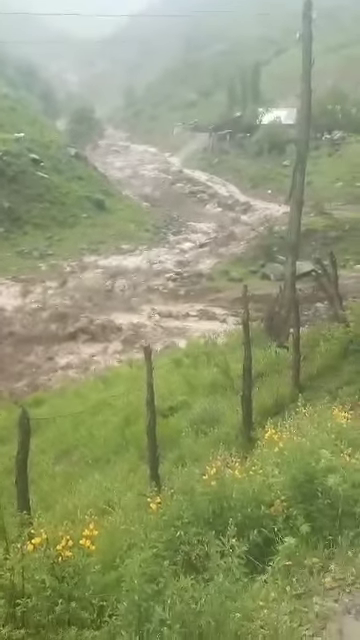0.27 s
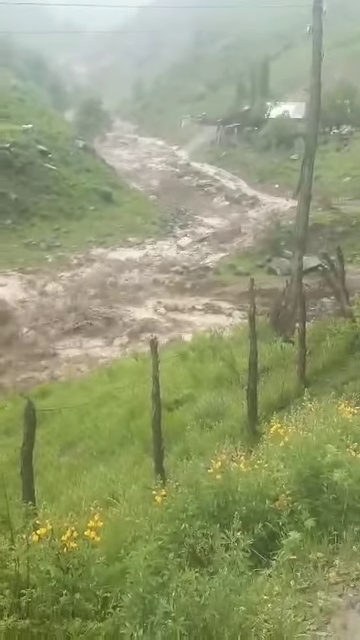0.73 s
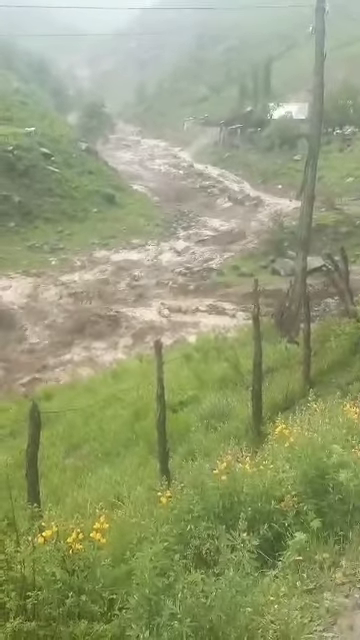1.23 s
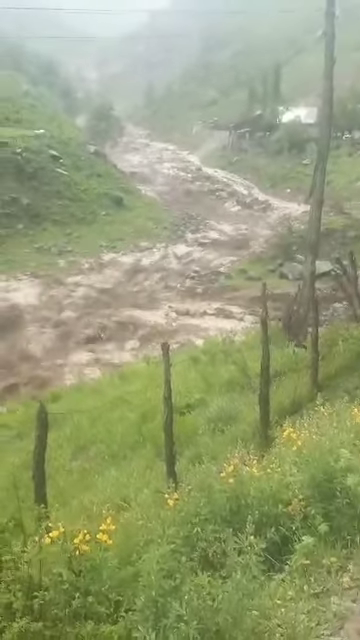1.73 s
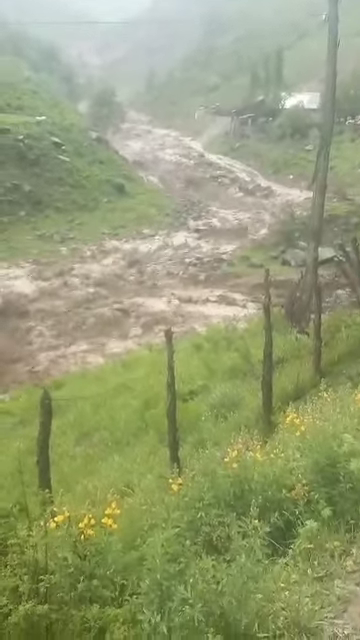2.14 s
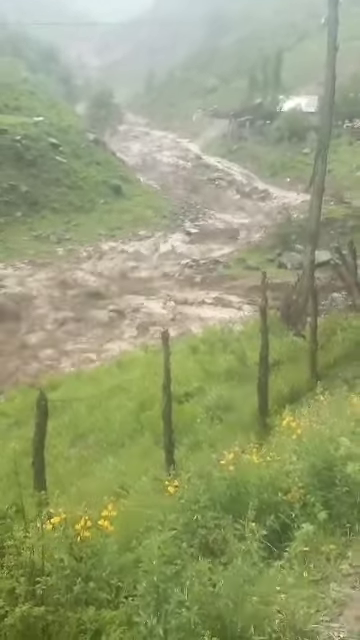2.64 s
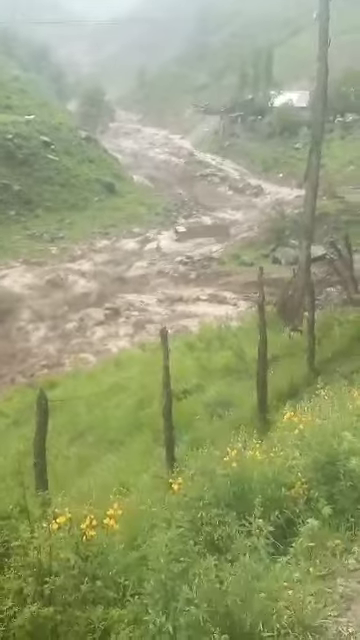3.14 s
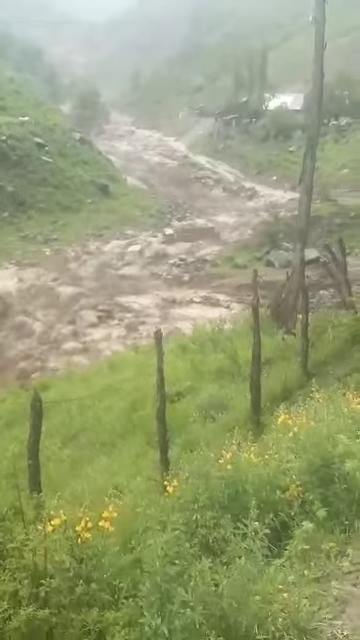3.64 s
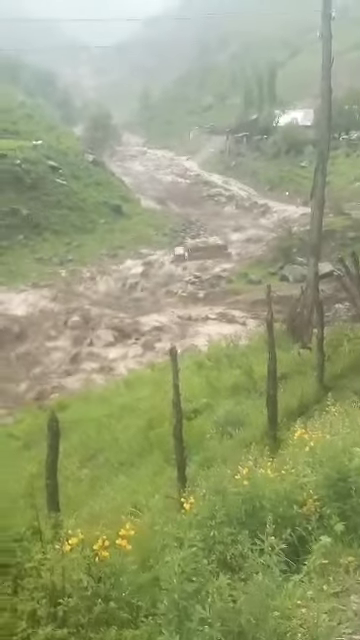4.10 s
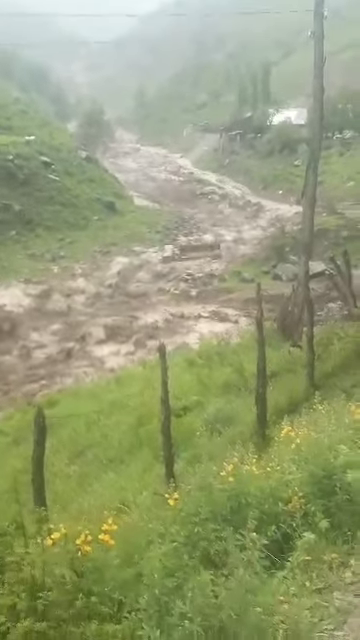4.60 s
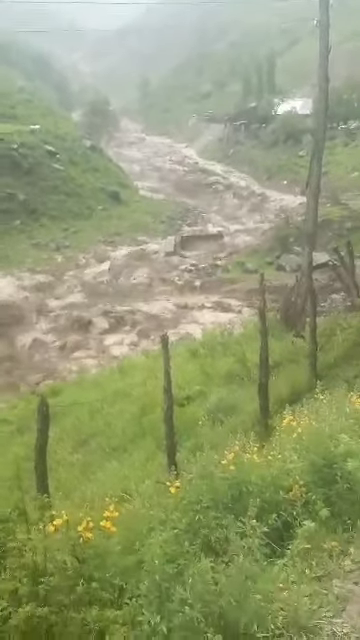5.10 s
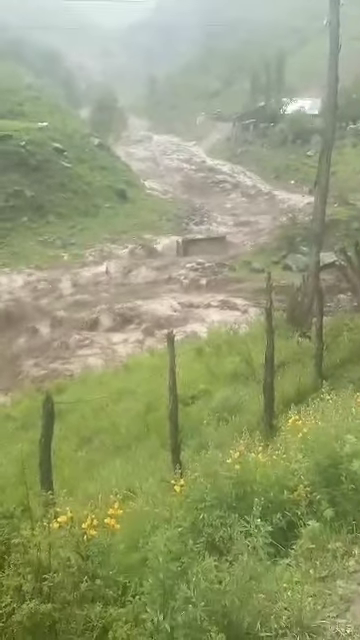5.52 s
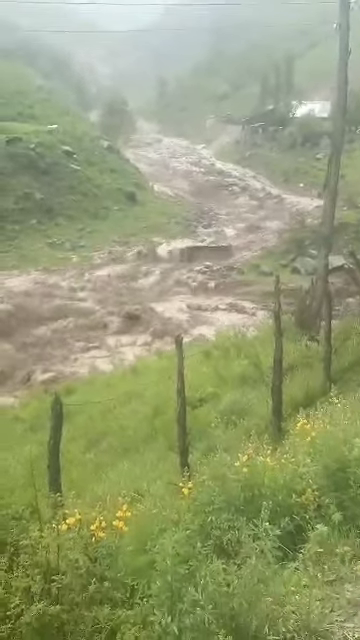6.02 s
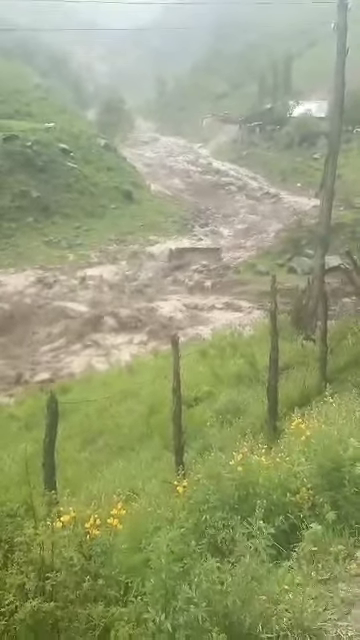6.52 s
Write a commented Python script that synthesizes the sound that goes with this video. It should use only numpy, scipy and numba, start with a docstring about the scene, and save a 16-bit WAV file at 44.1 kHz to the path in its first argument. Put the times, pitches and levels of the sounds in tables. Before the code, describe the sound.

Continuous heavy mudflow roar with deep rumble and thin spray, open on the right, muffled on the left, with sparse raindrop taps.

```python
"""Mudflow heard through one open and one covered port

A mudflow roars down a stream bed: shaped noise in half-octave bands gives rumble, slosh, churn and spray.
Stones knock as short damped sines. The phone's right port is open; the covered left one hears a muffled roar.
Raindrops tap the phone, mostly on the covered port, as decaying port modes with a crack and a tick.
The hardest drops make the limiter duck both channels."""
import sys
import numpy as np
from scipy import signal
from scipy.fft import rfft, irfft
from scipy.io import wavfile
from scipy.ndimage import uniform_filter1d, minimum_filter1d
from numba import njit

SR = 44100
rng = np.random.default_rng(int(sys.argv[2]) if len(sys.argv) > 2 else 0)


def store_pcm(level_fs):
    """Save levels as 16-bit WAV."""
    pcm = np.round(np.clip(level_fs, -1, 1) * 32767).astype(np.int16)
    wavfile.write(sys.argv[1], SR, np.atleast_2d(pcm).T)


N = 297675
HZ = np.arange(N // 2 + 1) * SR / N + 1e-9  # frequency of each Fourier bin, kept above 0 for the logarithms


def undb(db):
    """Amplitude ratio: 20 dB for each factor of ten."""
    return 10 ** (np.asarray(db) / 20)


def coloured(points, db):
    """Spectral shaping of white noise: its Fourier transform, weighted by a density curve, at an rms level in dB."""
    hz, density_db = np.transpose(points)
    shape = undb(np.interp(np.log(HZ), np.log(hz), density_db, right=-200))
    white = rfft(rng.standard_normal(N))
    return white * shape * undb(db) / np.sqrt(np.mean(shape ** 2))


def walk(rate):
    """Slow random modulation: levels held for 1 / rate s, smoothed by two moving averages; spread near 1."""
    hold = int(SR / rate)
    steps = np.repeat(rng.standard_normal(N // hold + 1), hold)
    return 1.3 * uniform_filter1d(uniform_filter1d(steps, hold), hold)[:N]


def butter(x, hz, kind, order):
    """Causal Butterworth filtering: a maximally flat low-, high- or band-pass."""
    return signal.sosfilt(signal.butter(order, hz, kind, fs=SR, output="sos"), x)


def torrent():
    """Band-wise amplitude modulation of noise: bands follow the flow, with shared and separate random flicker."""
    # The flow slackens and picks up again. Each row: time in seconds, roar level in dB (its mean is removed),
    # extra level in dB of the rumble, of the slosh and of the spray.
    flow = [(0.0, -29.5, 1, 1.5, 1.1), (.35, -29, -1, 1.5, 0.8), (0.75, -28.5, 0, -0.5, 0.4),
            (1.05, -28.5, 0, 1.5, 0.5), (1.45, -28, -2.7, -2, -0.4), (1.9, -28.5, 0.5, -0.1, 0),
            (2.45, -28.5, -0.5, 0.5, -0.2), (2.9, -29, 1, -0.6, -0.4), (3.2, -28, -2, -0.7, -.8),
            (3.6, -29, 1, -0.8, -0.3), (4.15, -28.5, -0.5, -0.8, -0.9), (4.45, -29, 1.2, 1.8, -0.3),
            (4.8, -30.5, -0.5, 0.5, 1), (5.1, -30, 1.5, -1.2, 0.6), (5.6, -29, -3.5, -0.6, -0.2),
            (6.05, -28.5, -1.5, -0.5, 0.2), (6.35, -29.5, -1, 2.5, 0.3), (6.75, -28, 0, -0.5, -0.7)]
    # Centres in Hz of boulder rumble, sloshing mud, churning water and spray.
    layer_hz = (80, 240, 700, 3500)
    # How far each of those layers follows the flow, in dB per dB.
    follows_flow = (0.87, 1.04, 0.84, 1.26)
    # Spectra of the three noises. Each row: frequency in Hz, relative density in dB per Hz.
    rumble_spectrum = [(15, -47), (25, -36), (42, -15.5), (57, -3.5), (80, -1), (105, 1), (135, -3.5),
                       (166, -6.5), (210, -6.5), (253, -5.5), (330, -11.5), (376, -20), (430, -20),
                       (520, -41), (970, -120)]
    roar_spectrum = [(340, -58), (430, -16.5), (470, -5.5), (549, -.5), (780, -4), (893, -7), (1320, -13.5),
                     (1760, -12), (2060, -7), (2220, -10.5), (2340, -17.5), (2500, -27.5), (3250, -39),
                     (5500, -120)]
    spray_spectrum = [(1350, -13.5), (2300, -7), (2590, -8), (2920, -5.5), (3190, -8), (3500, -5),
                      (3950, -8.5), (4270, -12), (4600, -9.5), (4990, -8), (6490, -16), (7800, -35),
                      (8650, -35), (10100, -26.5), (10900, -33.5), (12400, -29), (15500, -38)]
    rumble_rms_db, roar_rms_db, spray_rms_db = -18.5, -22, -35.5  # before the flow modulates them
    rumble_top_hz = 130  # boulder rumble below, sloshing mud above
    bass_hz = 380  # below it rumble and slosh take their extra levels
    spray_hz = 2500  # above it the spray comes and goes
    top_hiss_hz = 7000  # above it the bands share one extra random flicker
    low_flicker_db, high_flicker_db = 0.57, 0.25  # at 80 and 3500 Hz
    shared_db, top_flicker_db, tumble_depth_db = -0.08, 0.5, 1.0

    t = np.arange(N) / SR
    flow_s, flow_db, *extra_db = np.transpose(flow)
    rumble_db, slosh_db, spray_db = (np.interp(t, flow_s, db) for db in extra_db)
    surge_db = np.interp(t, flow_s, flow_db - np.mean(flow_db))
    water = coloured(rumble_spectrum, rumble_rms_db)
    water = water + coloured(roar_spectrum, roar_rms_db)
    water = water + coloured(spray_spectrum, spray_rms_db)
    gush, top_flicker, tumble = walk(7), walk(9), walk(14)
    out = np.zeros(N)
    for hz in 20 * 2 ** np.arange(0, 10.1, .5):
        # overlapping triangles on a log frequency axis add up to one
        band = irfft(water * np.clip(1 - 2 * abs(np.log2(HZ / hz)), 0, 1), N)
        follows = np.interp(np.log(hz), np.log(layer_hz), follows_flow)
        depth_db = np.interp(np.log(hz), np.log([80, 3500]), [low_flicker_db, high_flicker_db])
        level_db = follows * surge_db + shared_db * gush + depth_db * walk(12)
        if hz < rumble_top_hz:
            level_db += rumble_db + tumble_depth_db * tumble
        elif hz < bass_hz:
            level_db += slosh_db
        if hz > spray_hz:
            level_db += spray_db
        if hz > top_hiss_hz:
            level_db += top_flicker_db * top_flicker
        out += band * undb(level_db)
    return out


def knocks():
    """Impact resonance: stones clack under water as short damped sines, some at set times, many small at random."""
    # Stones at set times, most of them loud.
    # Each row: start in seconds, peak of the envelope in dB, pitch in Hz.
    timed = [(0.394, -31, 738), (4.895, -14, 681), (5.091, -16, 781), (5.995, -10.5, 660)]
    small_count, least_db, t60_s = 150, -26, 0.016  # least level holds for a small stone of 600 Hz
    chance = rng.random((small_count, 3))
    start_s = chance[:, 0] * N / SR
    small_db = least_db - 1.96 * np.log(1 - chance[:, 1])
    small_hz = 450 * 5 ** chance[:, 2]
    small_db -= 5.5 * np.log2(small_hz / 600)  # smaller stones ring higher and weaker
    small = np.transpose([start_s, small_db, small_hz])
    t = np.arange(2048) / SR
    out = np.zeros(N + len(t))
    for s, db, hz in [*timed, *small]:
        swell = (1 - np.exp(-t * hz)) * 1000. ** (-t / t60_s)
        out[int(s * SR):][:len(t)] += undb(db) * swell / swell.max() * np.sin(2 * np.pi * hz * t)
    return out[:N]


def raindrops():
    """Modal excitation: each drop jolts a port cavity, which rings for a few ms; its splash cracks and ticks."""
    # Each row: time of the ring's peak in seconds, port (0 left, 1 right), ring peak in dB,
    # push 1 or pull -1, thump boost over the other modes in dB, crack peak in dB, tick peak in dB.
    drops = [(.0284, 1, -45, 1, 0, -50, -40), (.4895, 0, -38, 1, 0, -36, -47),
             (.6107, 0, -20, -1, 0, -26, -38), (3.4591, 1, -45, 1, 0, -50, -37),
             (3.4605, 0, -24, -1, 0, -55, -62), (4.5281, 0, 8.5, 1, 0, -38, -26),
             (4.7428, 1, -45, 1, 0, -50, -40), (5.7214, 0, -19, -1, 16, -55, -50),
             (5.7214, 1, -45, 1, 0, -55, -45), (6.251, 0, -34, 1, 0, -60, -68),
             (6.4174, 0, -35, -1, 0, -55, -57), (6.63685, 0, 1, 1, 4, -36, -20)]
    # Port modes, the two lowest being the thump. Each row: frequency in Hz, level before filtering in dB,
    # 60 dB decay time in seconds.
    port_modes = [(330, -10, .014), (780, -3, .007), (1250, -8, .005), (2200, -7.5, .003)]
    # Splash tick of the left, then of the right port. Each row: lower and upper band edge in Hz.
    tick_hz = ((10300, 15600), (10000, 14600))
    crack_hz, port_low_hz, port_top_hz = (3200, 6800), 190, 3100
    splash_s = .00003  # time constant of the splash
    t = np.arange(1024) / SR
    modes = [undb(db) * np.cos(2 * np.pi * hz * t) * 1000. ** (-t / t60) for hz, db, t60 in port_modes]
    modes = butter(modes, port_top_hz, "low", order=6)
    modes = butter(modes, port_low_hz, "high", order=2)
    out = np.zeros((2, N + len(t)))
    for s, port, db, push, thump_db, crack_db, tick_db in drops:
        ring = undb(thump_db) * sum(modes[:2]) + sum(modes[2:])
        splash = rng.standard_normal(len(t)) * np.exp(-t / splash_s)
        crack = butter(splash, crack_hz, "band", order=4)
        tick = butter(splash, tick_hz[port], "band", order=4)
        drop = undb(db) * push * ring / ring.max()
        drop += undb(crack_db) * crack / abs(crack).max()
        drop += undb(tick_db) * tick / abs(tick).max()
        at = int(s * SR) - np.argmax(ring)
        out[port, at:at + len(t)] += drop
    return out[:, :N]


def covered_port(water):
    """Transmission loss: a first-order low-pass leak coloured by the gap, treble stopped by the cover."""
    # Resonances and dips of the gap under the cover. Each row: frequency in Hz, gain in dB.
    gap = [(10, 0), (350, 0), (450, 1.5), (540, 0), (800, 1), (1000, 0), (1200, -2.5), (1650, -4.5),
           (2070, -1), (2400, 9), (2950, 11), (3300, -3), (22050, 0)]
    # Steady noise seeping through by other paths. Each row: frequency in Hz, relative density in dB per Hz.
    seep = [(30, -12), (60, 9), (105, 11), (170, 4), (260, 2), (345, -1), (430, -1), (560, -6), (780, -6.5),
            (950, -10), (1200, -14), (1350, -14), (1650, -19.5), (1900, -16.5), (2200, -18.5), (2450, -16),
            (2950, -18), (3300, -35), (3900, -38), (4800, -44), (5500, -44), (7500, -55), (9000, -50),
            (12000, -46), (14000, -46), (15500, -53)]
    cover_db, cover_hz, cover_edge_hz, seep_rms_db = -3.5, 99, 2600, -42.5
    gap_hz, gap_gain_db = np.transpose(gap)
    gap_db = np.interp(np.log(HZ), np.log(gap_hz), gap_gain_db)
    leak = undb(cover_db + gap_db) / (1 + 1j * HZ / cover_hz)
    leak = leak / (1 + (HZ / cover_edge_hz) ** 4)
    return irfft(rfft(water) * leak, N) + irfft(coloured(seep, seep_rms_db), N)


def scene():
    """Superposition: left the muffled torrent, right the open torrent, drops on either port."""
    water = torrent() + knocks()
    return np.array([covered_port(water), water]) + raindrops()


@njit
def recover(gain, step):
    """Exponential release: the gain drops at once and creeps back towards one."""
    out, g = np.empty(len(gain)), 1.
    for i in range(len(gain)):
        g = min(gain[i], g + step * (1 - g))
        out[i] = g
    return out


def record(dry):
    """Linked peak limiting: one look-ahead gain for both channels, then an elliptic low-pass cuts the top."""
    ceiling_db, look_ahead_s, release_s, top_hz = -.45, 0.0079, 0.041, 16400
    ahead = int(look_ahead_s * SR)
    peak = np.max(abs(dry), axis=0) + 1e-9
    need = np.minimum(1, undb(ceiling_db) / peak)
    held = recover(minimum_filter1d(need, 2 * ahead + 1), 1 / (release_s * SR))
    gain = uniform_filter1d(held, ahead)
    top_cut = signal.ellip(8, .2, 70, top_hz, fs=SR, output="sos")  # 0.2 dB ripple, 70 dB stop band
    return signal.sosfilt(top_cut, dry * gain)


dry = scene()
out = record(dry)
store_pcm(out)
```